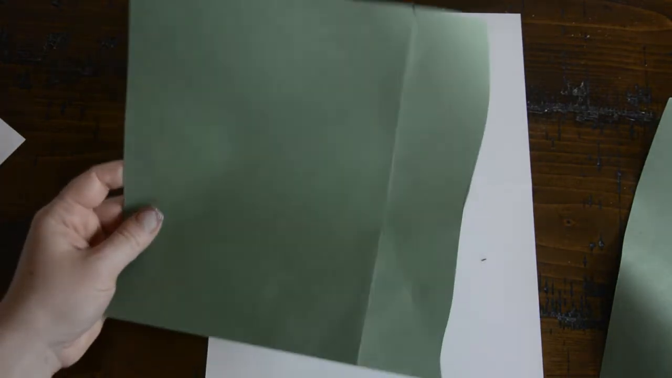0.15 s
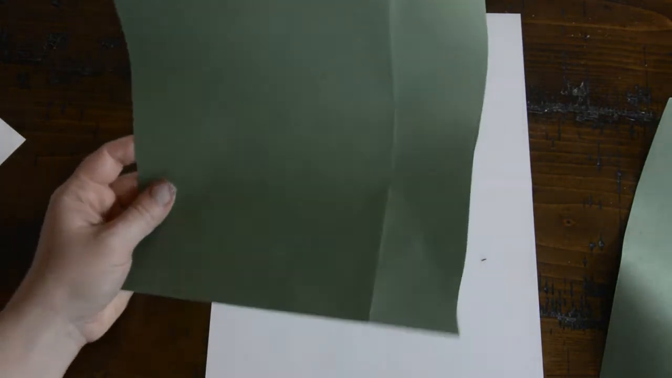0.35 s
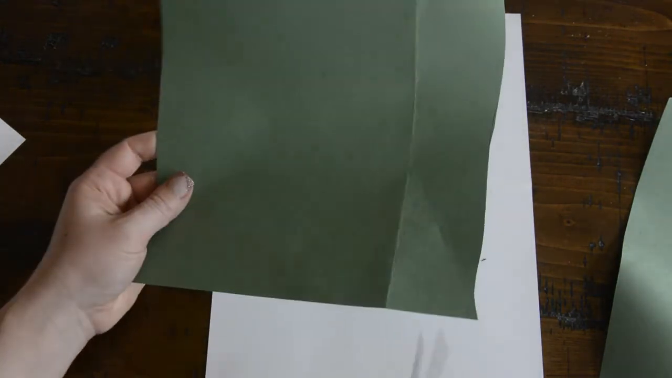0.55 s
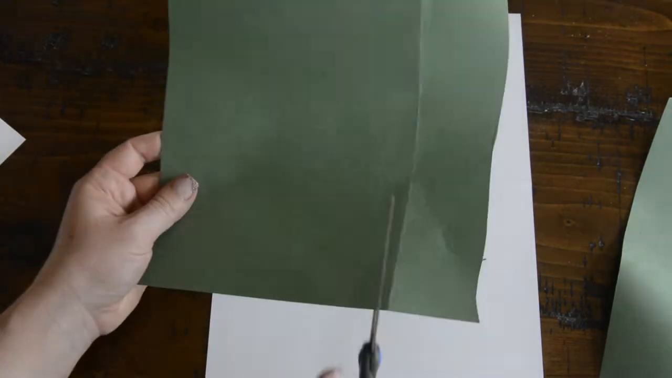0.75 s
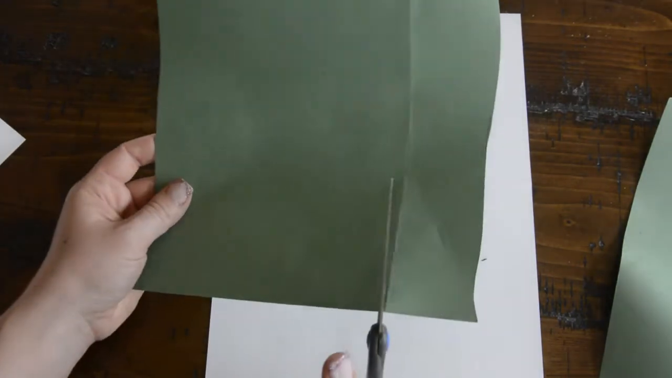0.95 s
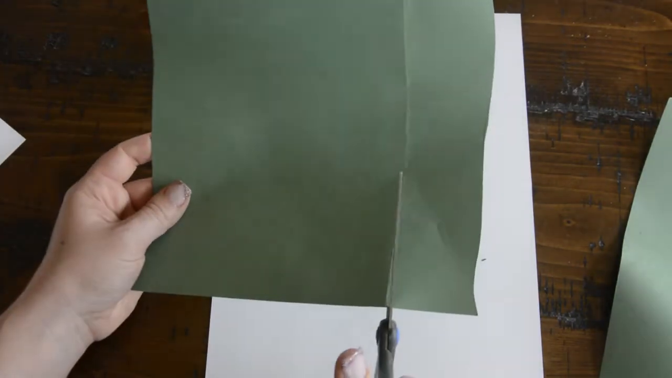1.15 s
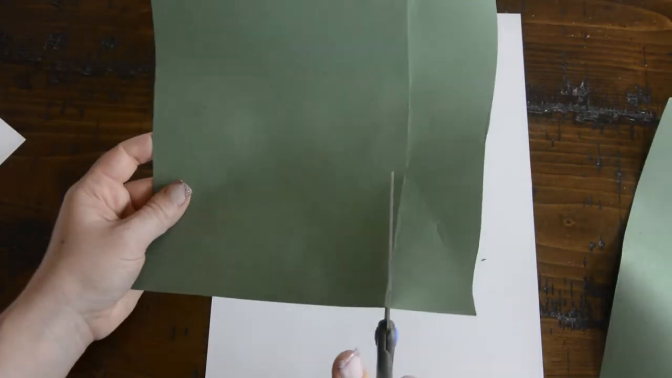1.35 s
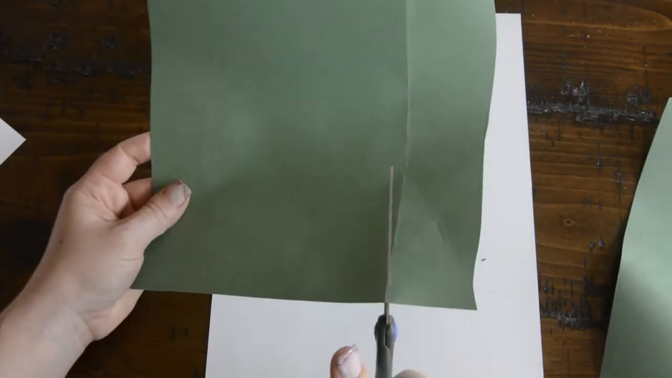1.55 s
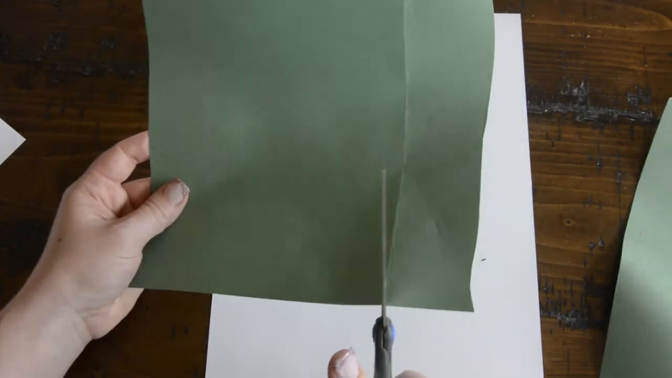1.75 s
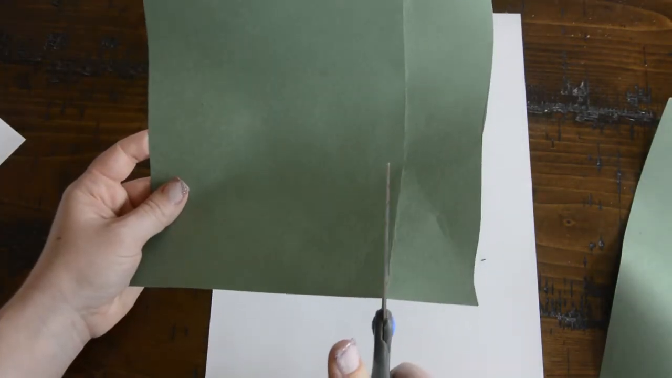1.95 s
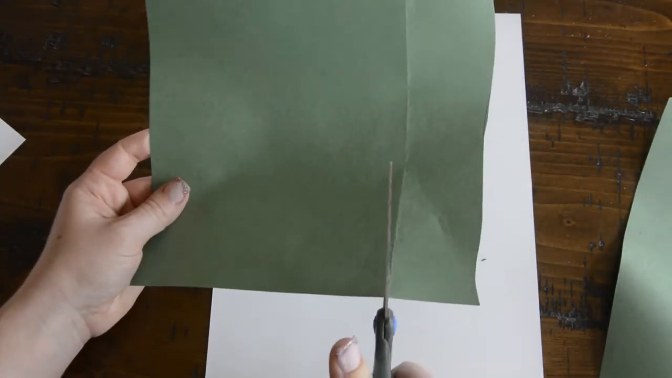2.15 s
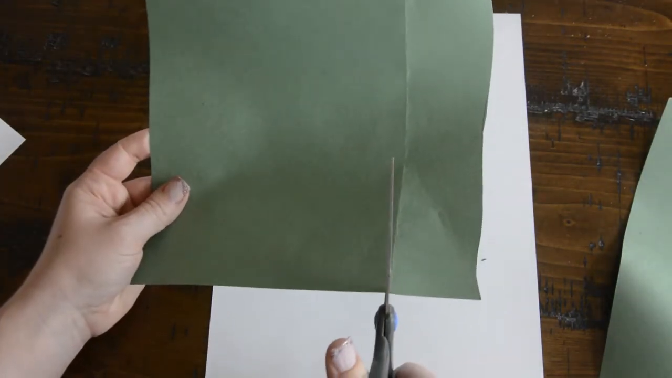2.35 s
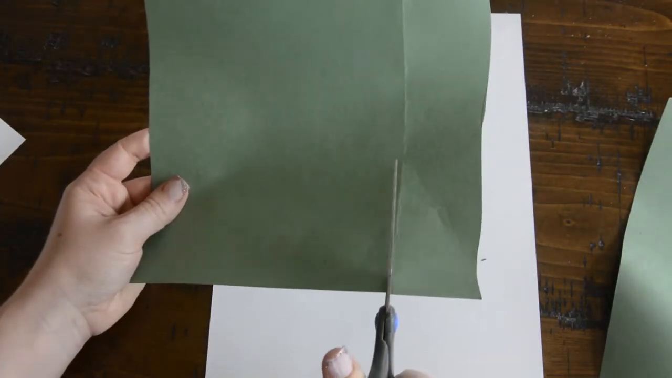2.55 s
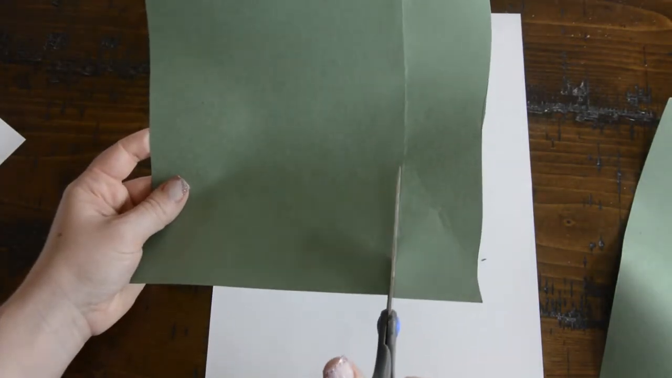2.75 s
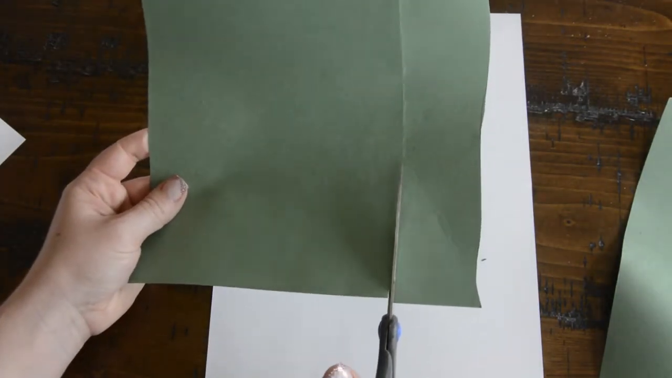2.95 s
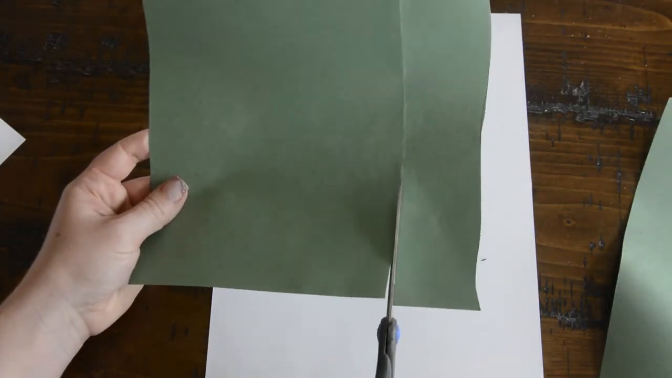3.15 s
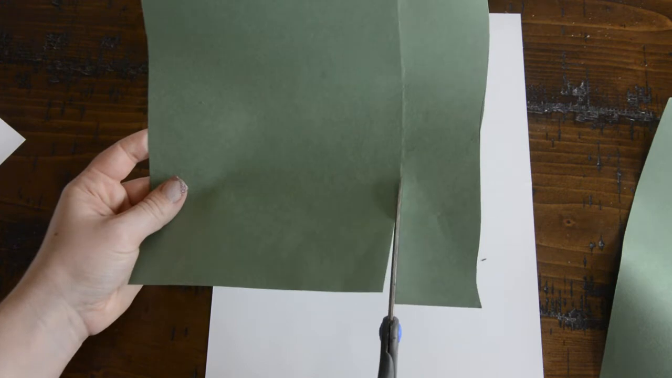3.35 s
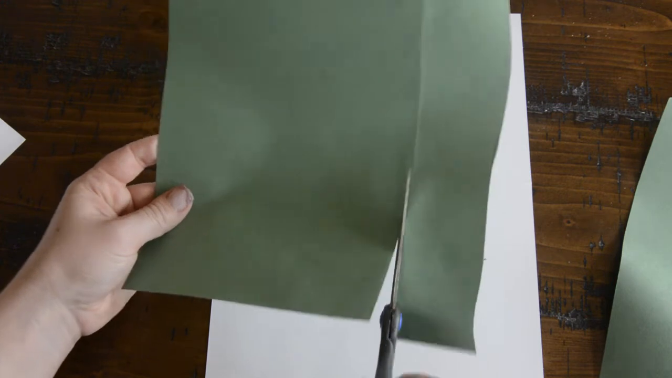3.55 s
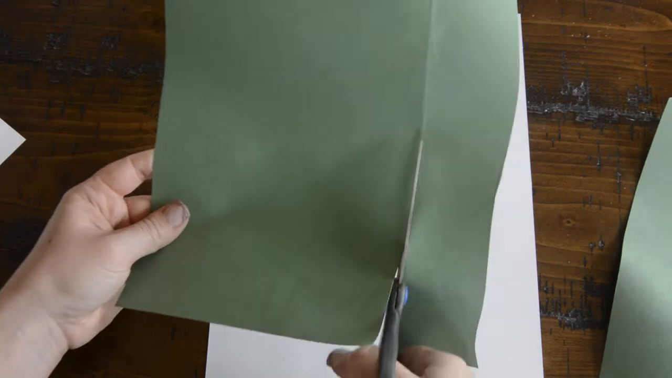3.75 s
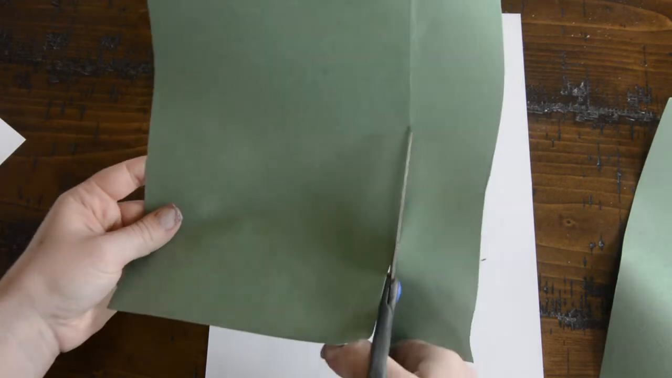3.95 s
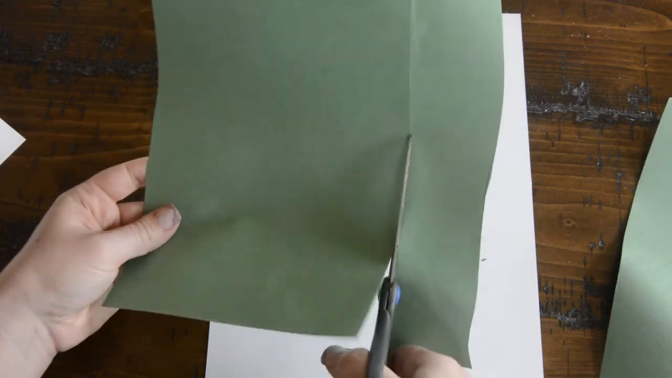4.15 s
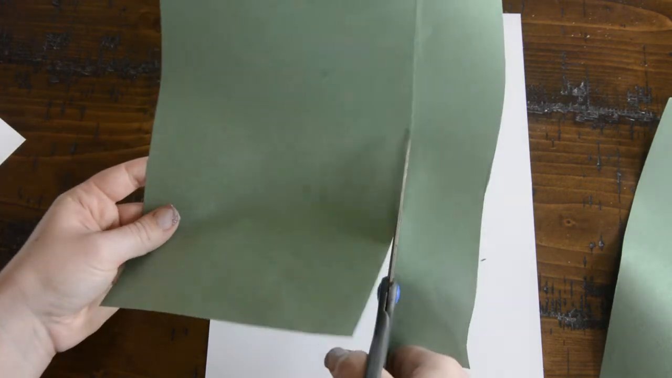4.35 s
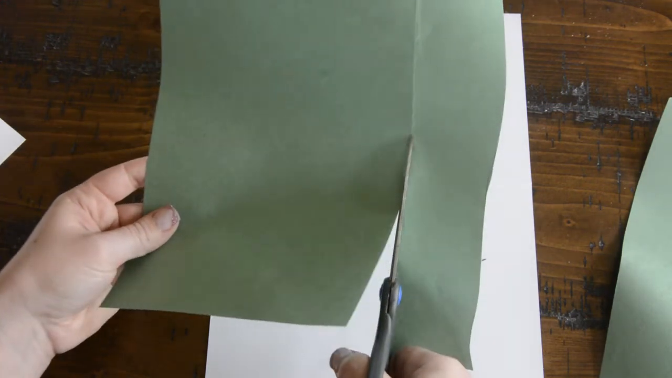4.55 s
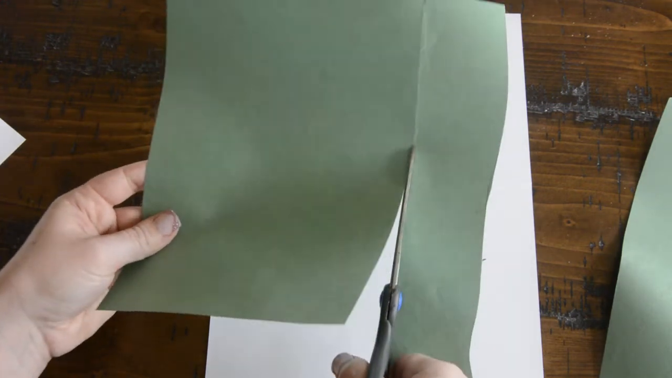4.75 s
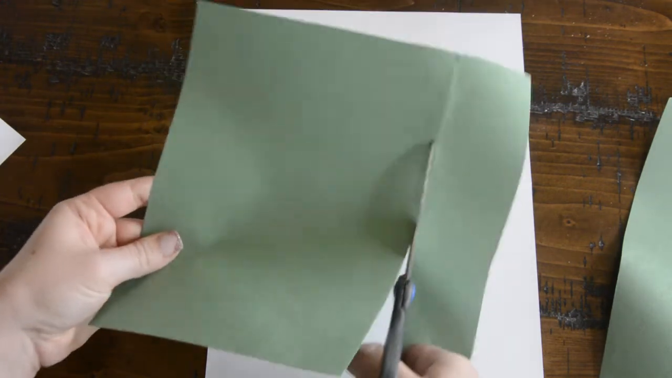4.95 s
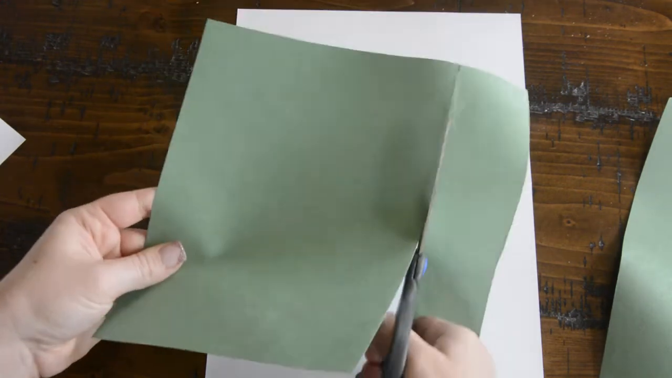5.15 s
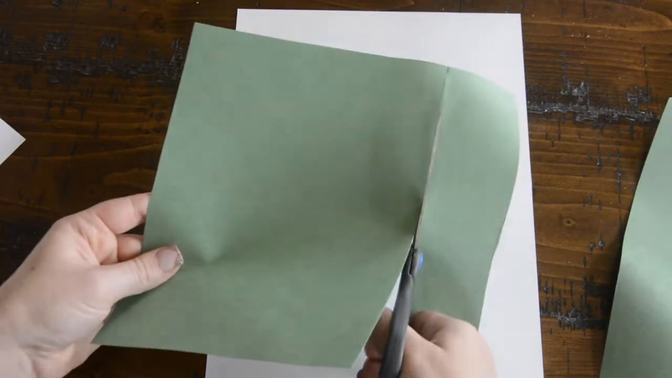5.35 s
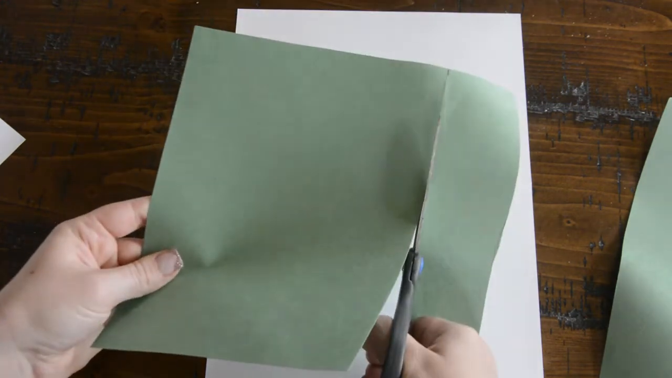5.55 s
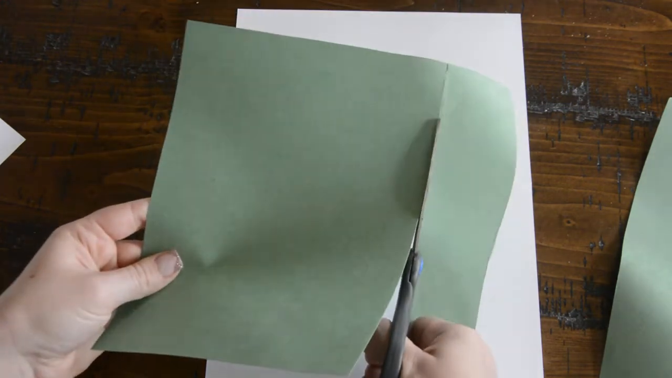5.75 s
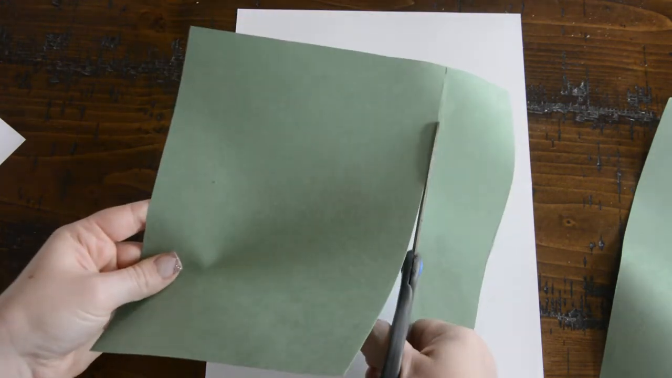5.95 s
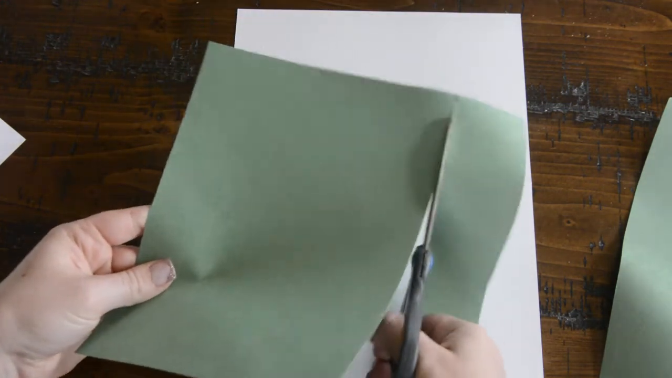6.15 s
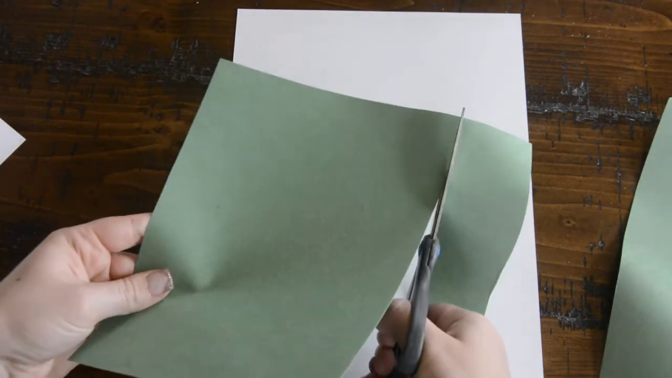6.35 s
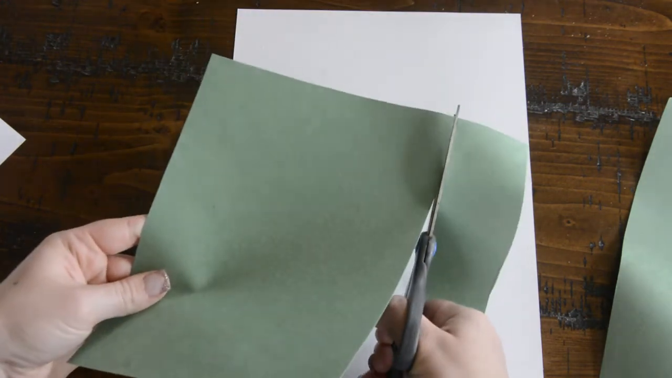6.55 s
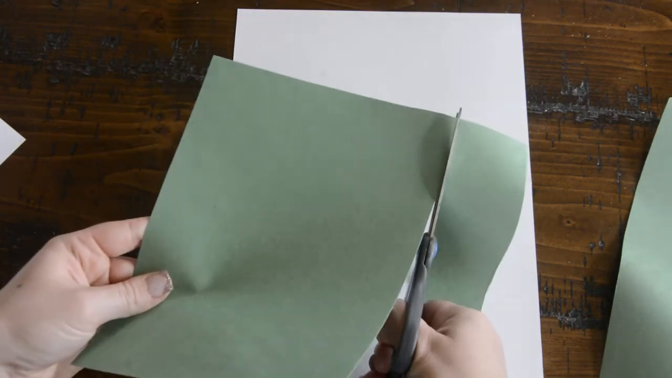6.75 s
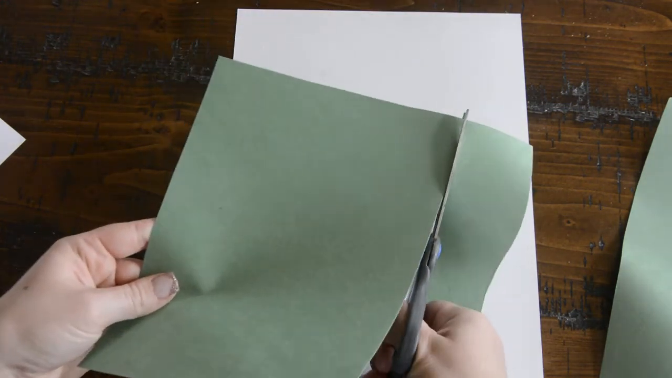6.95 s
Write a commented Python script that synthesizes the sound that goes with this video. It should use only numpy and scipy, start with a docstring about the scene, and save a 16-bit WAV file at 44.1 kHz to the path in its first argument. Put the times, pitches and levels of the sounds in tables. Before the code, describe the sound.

Close up in a small, quiet room, scissors make four unhurried cuts through stiff paper, each one rasping and crackling in little spurts, with a papery sliding sound between them. Before the cutting starts, the sheet is swung round with a quick flutter, the scissors clack and ring briefly as they leave a wooden table, and a few light taps and scrapes touch the paper.

```python
"""Scissors cutting stiff paper

Close up, over a wooden table in a small, quiet room. The sheet is swung round, and the scissors are picked
up with a ringing clack and set to its edge. Four closing strokes crunch through the fibres in short
spurts; between strokes the blades open and slide forward along the cut."""
import sys
import numpy as np
from scipy import signal
from scipy.fft import rfft, irfft, next_fast_len
from scipy.io import wavfile
from scipy.ndimage import uniform_filter1d, map_coordinates

SR = 44100
rng = np.random.default_rng(int(sys.argv[2]) if len(sys.argv) > 2 else 0)


def transcribe(u):
    """Save the signal u as a 16-bit wav file named by the first command-line argument.

    u: samples, shape (n,) or (channels, n), limited to [-1, 1]; the rate is SR.
    q: integer samples, one column per channel.
    """
    v = np.clip(np.atleast_2d(u).T, -1, 1)
    q = np.round(v * 32767).astype(np.int16)
    wavfile.write(sys.argv[1], SR, q)


N = 312845
TIME = np.arange(N) / SR


def amp(db):
    """Decibels to gain."""
    return 10 ** (np.asarray(db) / 20)


def unit(x):
    """Scale to rms 1."""
    return x / np.sqrt(np.mean(x ** 2) + 1e-20)


def along(points, hz):
    """Read (f/Hz, value) points on a log frequency axis."""
    f, values = np.transpose(points)
    return np.interp(np.log(hz + 1), np.log(f + 1), values)


def gains(rows):
    """One gain envelope for each dB column, silent outside the rows' time span."""
    times, *columns = np.transpose(rows)
    return [amp(np.interp(TIME, times, db)) * (TIME >= times[0]) * (TIME <= times[-1]) for db in columns]


def wobble(rate):
    """A smooth random curve, rate knots a second."""
    return map_coordinates(rng.standard_normal(int(N * rate / SR) + 4), [TIME * rate])


def blow(peak, rise, decay):
    """Envelope that swells up to its peak time, then falls 60 dB in decay seconds."""
    return np.exp(np.maximum(np.minimum((TIME - peak) / rise, (peak - TIME) * np.log(1000) / decay), -20))


def contact(start, end, growth_db, attack, release):
    """Envelope of a push: it sets in, ramps by growth_db while held and dies away after the end."""
    progress = np.clip((TIME - start) / (end - start), 0, 1)
    onset = 1 - np.exp(-np.maximum(TIME - start, 0) / attack)
    fade = np.exp(-np.clip((TIME - end) / release, 0, 20))
    return onset * fade * amp(growth_db * (progress - .5))


def swells(rows, lean=0.49):
    """Envelope of brief swells (t/s, level/dB, length/s) that start faster than they stop."""
    power = np.zeros(N)
    for centre, db, length in rows:
        near = slice(max(round(centre * SR) - SR // 20, 0), round(centre * SR) + SR // 20)
        offset = (TIME[near] - centre) / length
        skewed = offset / (1 + lean * np.sign(offset))
        power[near] += (amp(db) * 2 ** (-2 * skewed ** 2)) ** 2
    return np.sqrt(power)


def filtered(x, response):
    """Filter x by a complex response of frequency."""
    size = next_fast_len(N + SR // 2)
    return irfft(rfft(x, size) * response(np.fft.rfftfreq(size, 1 / SR)), size)[..., :N]


def coloured(x, points, size=4096):
    """Minimum-phase EQ of unit energy, falling 10 dB an octave beyond its (f/Hz, level/dB) points."""
    hz = np.fft.rfftfreq(size, 1 / SR) + 1
    octaves_beyond = np.abs(np.log2(hz / np.clip(hz, points[0][0], points[-1][0])))
    cepstrum = irfft(np.log(amp(along(points, hz) - 10 * octaves_beyond)))
    cepstrum[1:size // 2] *= 2
    cepstrum[size // 2 + 1:] = 0
    pulse = irfft(np.exp(rfft(cepstrum)))
    return signal.oaconvolve(x, pulse / np.linalg.norm(pulse))[:N]


def resonances(x, modes):
    """Ring x through resonances (f/Hz, width/Hz, level/dB) of unit total energy."""
    def response(f):
        bank = sum(amp(db) * 1j * f * width / (hz * hz - f * f + 1j * f * width) for hz, width, db in modes)
        return bank / np.sqrt(np.mean(np.abs(bank) ** 2))
    return filtered(x, response)


def stereo(mid, scattered, width):
    """Left and right hear nearly the same; scattered sound sets them apart."""
    side = filtered(scattered, lambda hz: amp(along(width, hz)))
    return np.array([mid + side, mid - side])


def room_tone(level_db=-56):
    """The faint, steady hush of the room, in stereo."""
    # colour of the hush: f/Hz, level/dB
    colour = [(30,-19),(55,-18),(80,-3.5),(115,-2),(220,-4),(530,3),(800,-2),(1100,-1),(1400,-5),(2400,-10),(3900,-11),(4400,-13.5),(7000,-16.5),(15800,-14.5)]
    # its stereo width: f/Hz, side over mid/dB
    width = [(40,-31),(150,-14),(500,-13.5),(1000,-14),(2000,-4.5),(4000,-3.5),(7000,2.5),(11000,-54)]
    mid, side = (amp(level_db) * unit(coloured(rng.standard_normal(N), colour)) for _ in range(2))
    return stereo(mid, side, width)


def room_echo(x, predelay_s=.005):
    """The walls answer; each frequency dies at its own speed."""
    # reverb time: f/Hz, t60/s
    decays = [(200,0.33),(600,0.48),(1500,0.78),(3700,0.55),(7000,0.59),(14000,0.41)]
    hz, t, noise = signal.stft(rng.standard_normal(SR * 3 // 4), SR, nperseg=256)
    fade = np.exp(-np.log(1000) * t / along(decays, hz)[:, None])
    tail = signal.istft(noise * fade, SR, nperseg=256)[1]
    tail = np.pad(tail, (int(predelay_s * SR), 0))
    return signal.fftconvolve(x, tail / np.linalg.norm(tail))[:N]


def table_scatter(x, size=256):
    """Reflections off the table top scramble the phase."""
    lag = np.pi * np.cumsum(rng.random(size // 2 + 1))
    return signal.oaconvolve(x, irfft(np.exp(-1j * lag)))[:N]


def fibres(rate, spread_db):
    """Tiny random snaps, rate a second, at rms 1."""
    chance, size, sign = rng.random(N), rng.standard_normal(N), rng.choice([-1, 1], N)
    return unit((chance < rate / SR) * sign * amp(spread_db * np.clip(size, -2, 2)))


def shifting(x, patchy_db=2.5):
    """The contact travels across the sheet, so each moment favours other resonances."""
    spectra = signal.stft(x, nperseg=256)[2]
    patches = uniform_filter1d(rng.standard_normal(spectra.shape), size=4, axis=0)
    patches = uniform_filter1d(patches, size=12, axis=1)
    return signal.istft(spectra * unit(amp(patchy_db * unit(patches))), nperseg=256)[1][:N]


def rubbing(envelopes, colour, rate, spread_db, judder_db, split_hz=2100):
    """A sliding contact plucks the paper grain: the sheet sounds below the split, the scrape above."""
    grain = coloured(fibres(rate, spread_db) * amp(judder_db * wobble(110)), colour)
    low = filtered(grain, lambda hz: 1 / (1 + (hz / split_hz) ** 6))
    sheet, scrape = envelopes
    return sheet * unit(low) + scrape * unit(grain - low)


def sheet_swing(attack_s=0.0013, flutter_fade_s=.11, hiss_fade_s=0.084):
    """The sheet swings round in two flaps and comes to rest."""
    # flaps: start/s, end/s, flutter/dB, surface hiss/dB
    flaps = [(0, 0.014, -33, -36.5), (0.11, 0.154, -38, -41.5)]
    # colour of the flapping sheet: f/Hz, level/dB
    colour = [(130, -15), (300, -9.5), (400, -10.5), (660, 0), (950, -8.5), (1100, 2.5), (2000, 2.5),
              (2400, -1.5), (3950, -4), (4900, -12), (5400, -7.5), (6200, -16.5), (8000, -22.5),
              (15800, -27)]
    envelopes = [[amp(flutter_db) * contact(start, end, 0, attack_s, flutter_fade_s),
                  amp(hiss_db) * contact(start, end, 0, attack_s, hiss_fade_s)]
                 for start, end, flutter_db, hiss_db in flaps]
    return rubbing(np.linalg.norm(envelopes, axis=0), colour, rate=7200, spread_db=2, judder_db=-0.2)


def grazing():
    """The open blades brush the paper's edge."""
    # grazes: start/s, end/s, sheet/dB, scrape/dB, growth/dB
    grazes = [(0.78, .9, -50.5, -49.5, 4), (0.977, 1.202, -52, -50, 4.5), (1.241, 1.249, -52.5, -49, 4),
              (1.296, 1.312, -53, -58, 2), (1.94, 1.98, -49, -48, -7)]
    # colour of the brushed edge: f/Hz, level/dB
    colour = [(200,-10),(450,-5),(1000,8.5),(1900,-6),(3000,-5),(3800,-6),(4300,-20),(5600,-19),(6800,-26.5),(15000,-32)]
    brush = sum(amp([[sheet], [scrape]]) * contact(start, end, growth, attack=0.0039, release=0.0038)
                for start, end, sheet, scrape, growth in grazes)
    return rubbing(brush, colour, rate=3700, spread_db=3.0, judder_db=1.5)


def touches():
    """Steel and fingers lightly tap the sheet and scrape its surface."""
    # contacts: t/s, tap/dB, scrape/dB, fizz/dB, rise/s, t60/s
    contacts = [(.111,-30,-28.5,-43,0.0005,0.018),(0.418,-65,-38.5,-36,0.006,0.16),(1.449,-36.5,-47,-56,0.0027,0.035),(1.454,-60,-29,-33,0.00091,0.012),
                (1.836,-32.5,-46,-51,0.0031,.018),(1.849,-29.5,-37.5,-51,0.002,0.095),(4.221,-25,-33.5,-45,0.0013,0.076)]
    # the tapped sheet, a steel edge flicking it and the fizz on top: f/Hz, level/dB
    tap_colour = [(100,-41),(330,-11.5),(520,-15.5),(810,0.5),(950,-10),(1130,0),(1500,-11.5),(2400,-8),(3500,-17)]
    scrape_colour = [(1500,-30),(2700,-2),(3300,-2),(3800,-1),(4500,-4),(5250,-1),(6300,-15),(10000,-30)]
    fizz_colour = [(4500,-66),(8000,-5),(9500,-5),(11000,-1.5),(12400,-2),(13800,-2),(15800,-2)]
    forces = sum(amp([[tap], [scrape], [fizz]]) * blow(at, rise, decay)
                 for at, tap, scrape, fizz, rise, decay in contacts)
    return sum(coloured(force * fibres(rate=13000, spread_db=0), colour)
               for force, colour in zip(forces, (tap_colour, scrape_colour, fizz_colour)))


def pick_up(clatter_db=-1, ring_db=-17, strike_db=4.5, strike_click_db=-3, blade_lag_s=0.0011):
    """Handles and blades strike and chatter as they leave the table; the steel rings on."""
    # knocks: t/s, clatter/dB, steel click/dB, t60/s
    knocks = [(0.5997,-11,-13,0.017),(0.606,-17,-33,0.082),(0.616,-26,-41,0.056),(0.6232,-20.5,-27,0.11),(0.652,-37,-36,0.059),(0.694,-30,-47,0.12)]
    # ringing modes of the steel: f/Hz, level/dB, t60/s
    modes = [(1370,-13,.6),(1778,-14,.7),(1876,-8,.4),(1929,-5,.4),(1969,0,.33),(2160,-10,.4),(2199,-9,.5),(2308,-3,.3),(2715,-12,.4),(3118,-6,.15),(3865,-17,.3),(5335,-10,.18)]
    # clattering handles and clicking blades: f/Hz, level/dB
    clatter_colour = [(900,-32),(1350,-7),(1700,-8),(1980,0.5),(2300,-4),(2550,-10),(3150,-7),(3700,-16),(4600,-22.5)]
    click_colour = [(2400,-15.5),(3200,10.5),(3900,-4.5),(4600,-5),(5400,3.5),(6300,-10.5),(7000,-11),(9000,-19.5),(11300,-8.5),(12500,-14),(15800,-21)]
    t = TIME[:SR]
    ring = sum(amp(db) * np.exp(-np.log(1000) * t / t60) * np.sin(2 * np.pi * hz * t)
               for hz, db, t60 in modes)
    steel = np.zeros(N)
    for at, db, _, _ in knocks:
        steel[round(at * SR):][:SR] += amp(db + ring_db) * ring
    forces = sum(amp([[clatter], [click]]) * blow(at, 0.00053, decay) for at, clatter, click, decay in knocks)
    handles, blades = forces * fibres(rate=23000, spread_db=3)
    # the first contact is one hard blow: the handles land just before the blades
    first = knocks[0][0]
    handles[round(first * SR)] += amp(strike_db)
    blades[round((first + blade_lag_s) * SR)] += amp(strike_click_db)
    clack = amp(clatter_db) * coloured(handles, clatter_colour) + coloured(blades, click_colour)
    return filtered(steel + clack, lambda hz: (1j * hz / (1j * hz + 150)) ** 2)  # the clack and ringing carry no bass


def table_bumps():
    """The wood answers the hand and scissors with dull bumps."""
    # bumps: t/s, level/dB, rise/s, t60/s
    bumps = [(0.601,-34,0.0064,0.48),(0.738,-37,0.02,0.26)]
    # body of the table: f/Hz, level/dB
    wood = [(25,-42),(55,-38),(115,-10),(175,-6),(250,-6.5),(330,-3.5),(520,-4.5),(800,-6),(1500,-3.5)]
    push = sum(amp(db) * blow(at, rise, decay) for at, db, rise, decay in bumps)
    return coloured(push * rng.standard_normal(N), wood)


def sliding(level_db=-1.18):
    """The blades open and rub forward between the cut edges."""
    # one envelope per slide: t/s, sheet/dB, scrape/dB
    slides = [
        [(3.49, -61, -65), (3.5, -40, -34), (3.556, -28, -36.5), (3.608, -41.5, -39.5), (3.752, -30, -33),
         (3.768, -46, -39), (3.776, -30.5, -35.5), (3.884, -42, -44), (3.91, -53, -66)],
        [(4.9, -54, -45), (4.932, -37.5, -32), (4.99, -36.5, -35.5), (5.154, -40, -39.5), (5.192, -53, -55),
         (5.216, -49, -47.5), (5.27, -52, -56)],
        [(6.11, -52, -47), (6.142, -36.5, -38), (6.168, -42, -45), (6.196, -36.5, -33.5), (6.334, -50, -37.5),
         (6.386, -57, -54), (6.41, -45, -41), (6.464, -53, -44), (6.48, -56, -68)],
    ]
    # one colour per slide: f/Hz, level/dB
    colours = [
        [(130, -45), (300, -13.5), (660, -6), (820, 0.5), (2000, -13.5), (3100, -5.5), (4400, -12.5),
         (5400, -13.5), (6200, -22), (7000, -20), (8000, -30), (10700, -17), (12200, -25), (15800, -26)],
        [(130, -22), (530, -4), (660, 1), (1100, 3.5), (2000, -3), (2400, -1.5), (2800, -5.5), (3500, -5.5),
         (4400, -11.5), (5400, -10), (7000, -12), (8000, -19.5), (13800, -20.5), (15800, -25)],
        [(130, -23), (530, -4.5), (660, -7.5), (1100, 4), (1300, -4.5), (1600, 1), (2000, -10.5), (2800, -2),
         (3900, -3.5), (6200, -14.5), (8000, -14), (9200, -21), (10700, -17.5), (12200, -23), (15800, -23)],
    ]
    rub = sum(rubbing(gains(rows), colour, rate=8000, spread_db=3.5, judder_db=1.5)
              for rows, colour in zip(slides, colours))
    return amp(level_db) * shifting(rub)


def bites(count=400, per_second=42, jitter=.22, length_s=.004, spread_db=1.5):
    """Envelope of thin fibre bunches giving way at an uneven pace."""
    late, size, stretch = rng.standard_normal((count, 3)).T
    times = (np.arange(count) + 1 + jitter * late) / per_second
    return swells(zip(times, spread_db * size, length_s * np.exp(0.18 * stretch)))


def cutting(blade_db=-9, judder_db=3.0, jam_db=-27, jump_rasp_db=2.5, tip_flex_db=5.5, tip_s=0.094):
    """Fibres snap between the closing blades, steadily and in spurts, and shake the sheet."""
    # strokes: start/s, end/s, attack/s, crackle/dB, growth/dB, then over the crackle: flex/dB,
    # rasp/dB, bites/dB
    strokes = [(2.322, 3.373, 0.039, -42, 0.5, -12, -5.5, 2.5),
               (4.041, 4.793, 0.059, -42.5, 2, -5, -3.5, 7.5),
               (5.353, 6.015, 0.033, -45.5, 5, -6, -4.5, 7.5),
               (6.614, 6.921, 0.029, -42.5, -9.5, -8, -5, 5.5)]
    # the blades jump through thick bunches of fibres: t/s, level/dB, length/s
    spurts = [(2.504, -34, 0.0033), (2.533, -35.5, 0.016), (2.661, -35.5, 0.0049), (2.817, -34.5, 0.003),
              (2.844, -33, 0.0064), (2.899, -30, 0.0033), (2.919, -29, 0.0047), (2.953, -32, 0.0084),
              (2.984, -32.5, 0.0096), (3.061, -30.5, 0.0019), (3.082, -28, 0.0059), (3.094, -37, 0.0065),
              (3.118, -30.5, 0.0047), (3.155, -25, 0.0046), (3.207, -24.5, 0.0017), (3.236, -31, 0.005),
              (3.257, -31, 0.0032), (3.289, -29.5, 0.0074), (3.321, -30, 0.011), (3.344, -26.5, 0.003),
              (4.206, -35.5, 0.0031), (4.338, -36, 0.003), (4.405, -35.5, 0.0074), (4.448, -33, .004),
              (4.529, -31, 0.0034), (4.542, -30.5, .007), (4.622, -30, 0.002), (4.724, -33.5, 0.0059),
              (4.74, -36.5, .007), (4.762, -30, 0.0026), (4.809, -30.5, 0.0025), (4.827, -28.5, 0.0014),
              (5.532, -34, .004), (5.545, -38, 0.0053), (5.599, -34, 0.0044), (5.689, -32.5, 0.0063),
              (5.725, -33, 0.0062), (5.769, -36.5, 0.012), (5.785, -38.5, .009), (5.885, -37, 0.0051),
              (5.942, -26, 0.0035), (5.968, -35.5, .006), (5.987, -34, 0.0079), (6.013, -29, .003),
              (6.619, -35, 0.0044), (6.709, -31.5, 0.0044), (6.745, -32, 0.0033), (6.781, -34, 0.0034),
              (6.816, -37, 0.004), (6.855, -34, 0.0065), (6.876, -32.5, 0.0043), (6.949, -38.5, 0.0021)]
    # jammed blades duck the crackle (only rows with end after start act): start/s, end/s
    jams = [(3.012, 3.078), (3.166, 3.24), (4.179, 4.05), (4.503, 4.43), (4.788, 4.5), (5.508, 5.528),
            (5.918, 6), (6.79, 6.7)]
    # the sheet crunching around the cut, its flexing, and one edge rasp per stroke: f/Hz, level/dB
    crunch_colour = [(100,-33.5),(230,-28.5),(400,-15.5),(520,-12),(650,-8),(850,-1.5),(1080,1),(1300,-5),(1700,-10),(2300,-23),(4000,-69)]
    flex_colour = [(1000,-33),(1600,5.5),(2100,1),(2600,1),(3500,-6.5)]
    rasp_colours = [
        [(1600, -31), (2400, -6), (3100, 2), (3500, -1.5), (3950, 0.5), (4400, -13), (4900, -9.5), (5400, -9.5),
         (6200, -15), (7000, -16), (8000, -19.5), (9200, -19.5), (10700, -18), (13800, -29), (15800, -27)],
        [(1600, -40), (2400, 0), (3100, 2.5), (3500, -1.5), (3950, -12), (4400, -10), (4900, -7), (5400, -6),
         (6200, -14), (7000, -13.5), (8000, -16.5), (10700, -16.5), (12200, -16), (13800, -20), (15800, -18)],
        [(1600, -12), (2400, -4.5), (3100, -4), (3500, -4.5), (3950, -0.5), (4400, -3.5), (4900, -6),
         (5400, -9.5), (6200, -9.5), (7000, -19), (8000, -16), (10700, -19.5), (12200, -19), (13800, -17),
         (15800, -29)],
        [(1600, -29), (2400, -24), (2800, -8), (3100, 1), (3500, -2), (3950, 0), (4400, -1), (4900, -4),
         (5400, -11), (6200, -13), (7000, -13.5), (9200, -16.5), (12200, -22), (13800, -19), (15800, -33)],
    ]
    # the blades sing faintly as fibres snap on their edges: f/Hz, width/Hz, level/dB
    blade_modes = [(3980,160,0),(10800,700,-14),(13800,600,-13)]
    stick_slip = unit(amp(judder_db * wobble(170)))
    moving = amp(jam_db * sum((TIME > start) & (TIME < end) for start, end in jams))
    thick, thin = swells(spurts), bites()
    snaps = lambda: fibres(rate=5500, spread_db=5.0)
    tearing = snaps()
    body, bend, edge, rasping = np.zeros((4, N))
    for stroke, colour in zip(strokes, rasp_colours):
        start, end, attack, db, growth_db, flex_db, rasp_db, bite_db = stroke
        push = amp(db) * contact(start, end, growth_db, attack, release=0.011) * moving
        steady = push * stick_slip
        jumps = np.hypot(amp(bite_db) * push * thin, thick * (TIME > start) * (TIME < end + .5))
        crunch = np.hypot(steady, jumps)
        rasp = amp(rasp_db) * np.hypot(steady, amp(jump_rasp_db) * jumps)
        # the sheet bends more as the cut runs out to the blade tips
        near_tips = np.exp(np.clip((TIME - end) / tip_s, -20, 0))
        bend += crunch * amp(flex_db + tip_flex_db * near_tips)
        body += crunch
        edge += rasp
        rasping += coloured(tearing * rasp, colour)
    sheet = coloured(snaps() * body, crunch_colour) + coloured(snaps() * bend, flex_colour)
    return sheet + shifting(rasping) + amp(blade_db) * resonances(snaps() * edge, blade_modes)


def scene(echo_db=-8, scatter_db=-2):
    """The close handiwork in a narrow stereo image, with its echo and the room tone."""
    # stereo width of the handiwork: f/Hz, side gain/dB
    width = [(30,-18),(150,-19),(500,-26),(1000,-32),(2000,-22),(4000,-15),(7000,-13.5),(12000,-12.5)]
    work = cutting() + sliding() + sheet_swing() + grazing() + touches() + pick_up() + table_bumps()
    mid = work + amp(echo_db) * room_echo(work)
    scattered = amp(scatter_db) * table_scatter(work) + amp(echo_db) * room_echo(work)
    return stereo(mid, scattered, width) + room_tone()


def record(dry):
    """A brick-wall low-pass takes off the very top of the treble."""
    return filtered(dry, lambda hz: hz < 15950)


dry = scene()
out = record(dry)
transcribe(out)
```